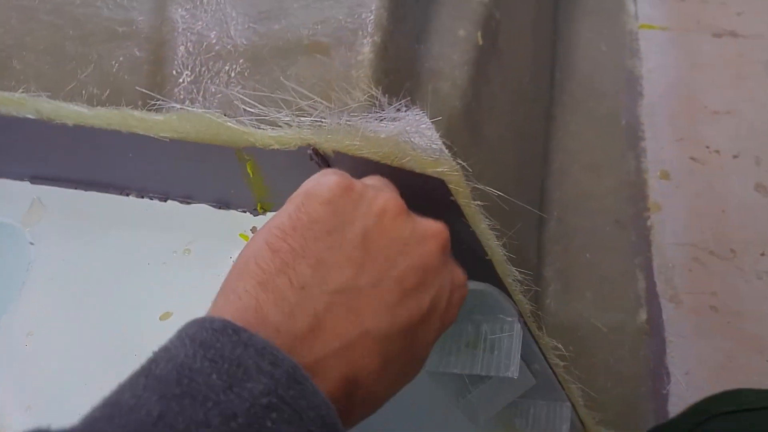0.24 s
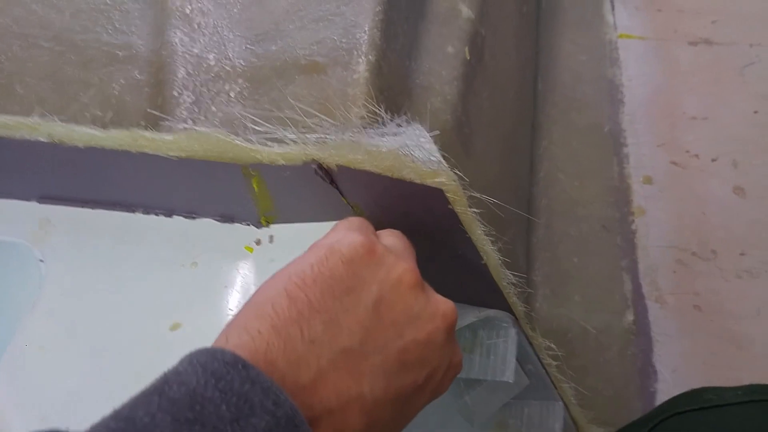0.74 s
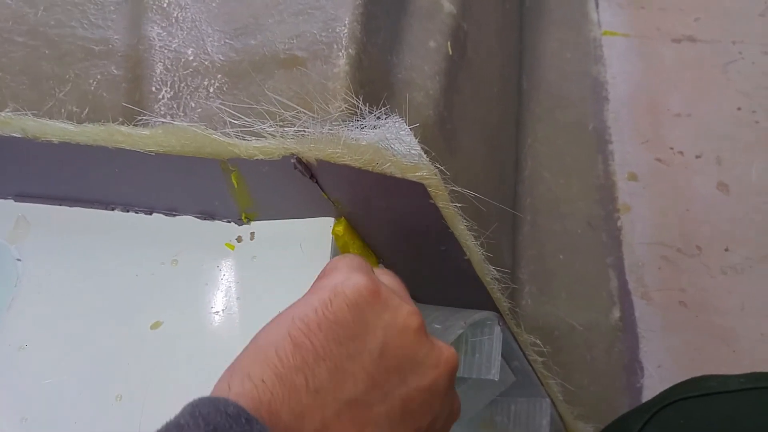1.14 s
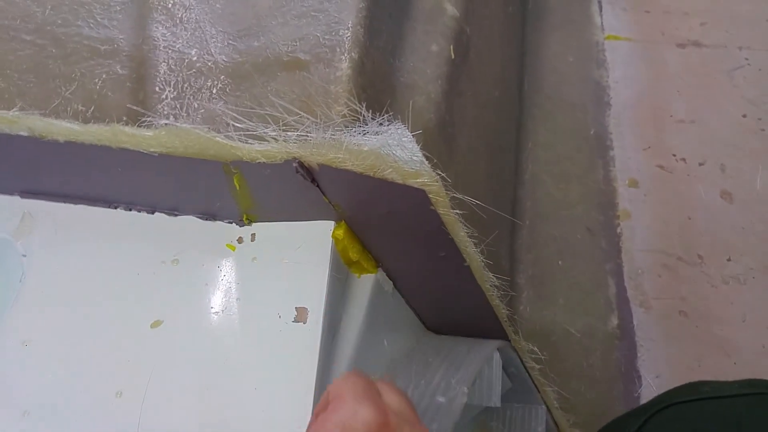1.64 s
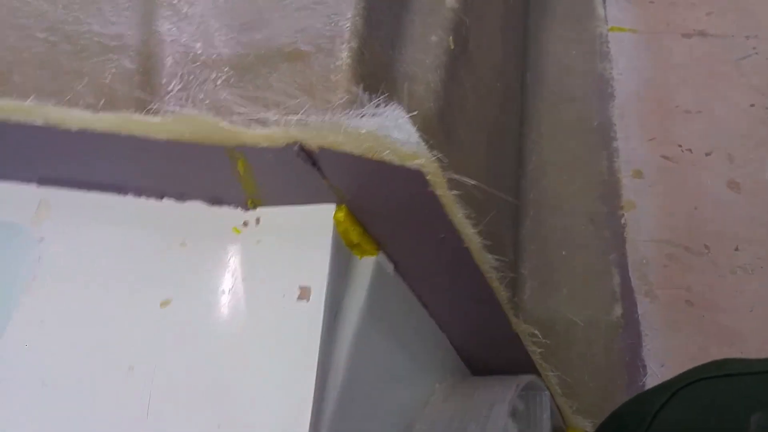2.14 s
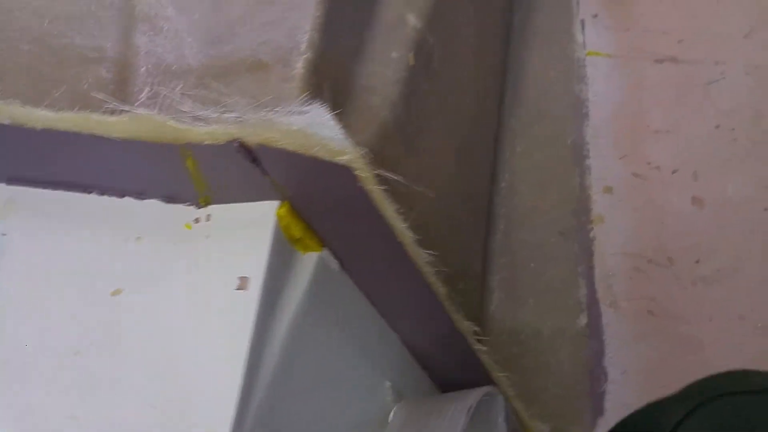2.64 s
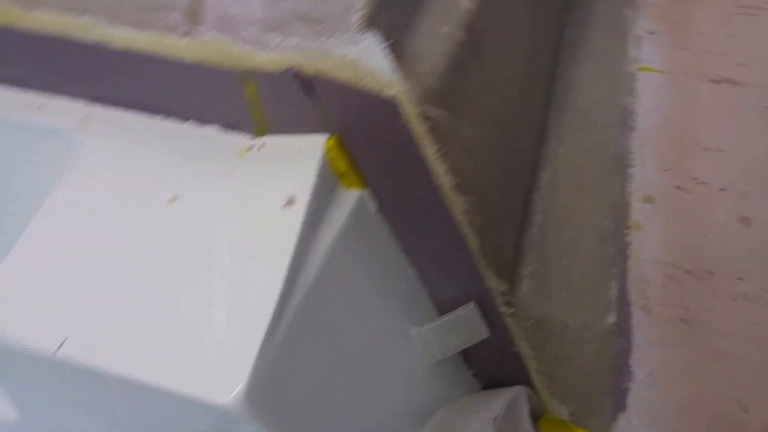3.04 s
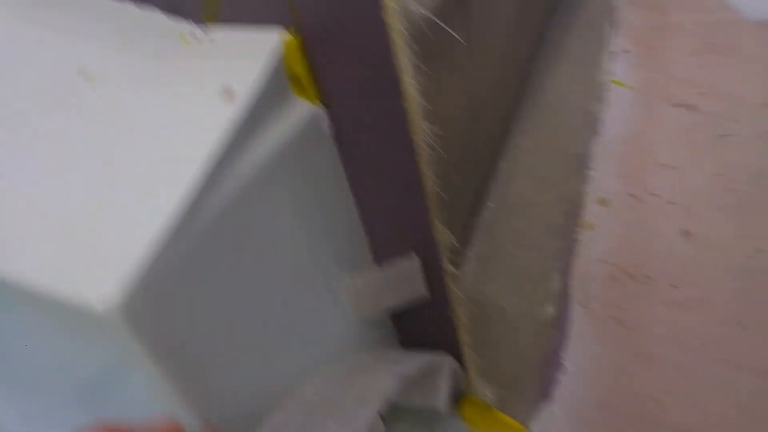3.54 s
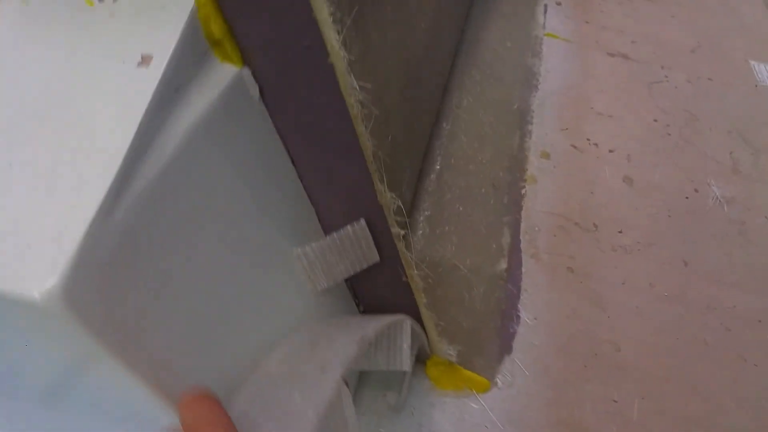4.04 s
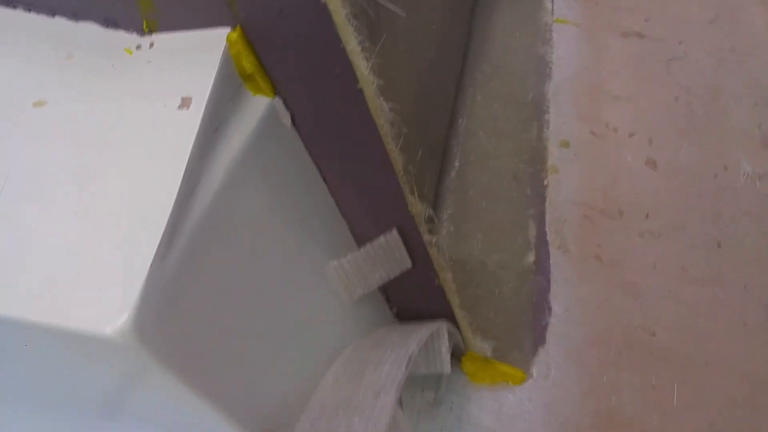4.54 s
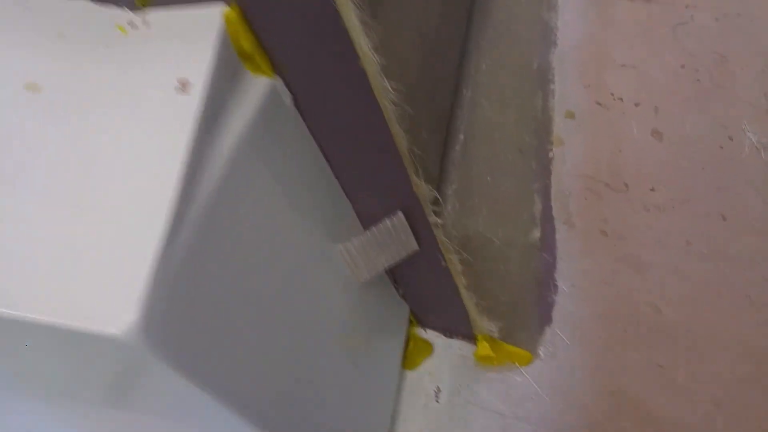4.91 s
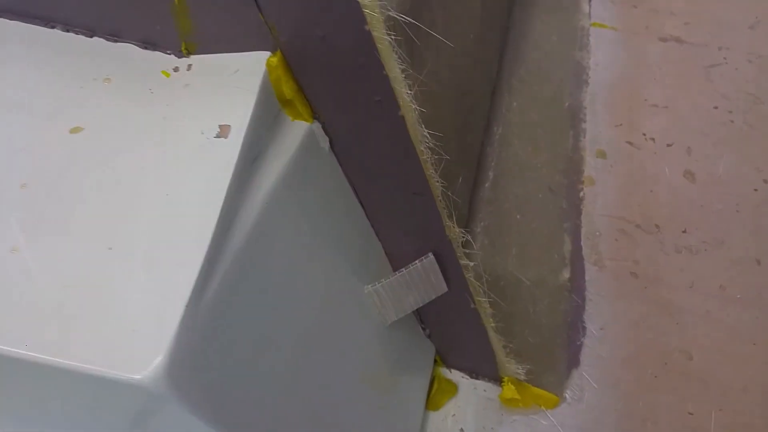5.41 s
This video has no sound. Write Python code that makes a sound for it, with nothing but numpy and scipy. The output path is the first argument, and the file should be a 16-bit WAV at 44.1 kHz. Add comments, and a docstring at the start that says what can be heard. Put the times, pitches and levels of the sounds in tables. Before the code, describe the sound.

Sharp cracks, snaps and fibrous tearing as a stiff fibreglass mould edge is pried loose, with hollow knocks and low air thumps in a workshop.

```python
"""Fibreglass mould prised off its base

A workshop, the mould close to two microphone ports, with a low background rush and a rustling sleeve.
The bond lets go in single snaps, a creak and runs of tearing; each crack sends a bending wave through
the laminate and rings the hollow shell. The loosened edge judders, knocks, booms and fans air, mostly
at the right port. Near surfaces slap back and a bright room answers with diffuse echoes."""
import sys
import numpy as np
from scipy import signal
from scipy.fft import rfft, irfft
from scipy.io import wavfile

SR = 44100
rng = np.random.default_rng(int(sys.argv[2]) if len(sys.argv) > 2 else 0)


def put_to_file(sound):
    """Save the sound as 16-bit audio at rate SR, in the file named by the first command-line argument."""
    columns = np.atleast_2d(sound).T  # one column per channel
    safe = np.clip(columns, -1, 1)
    whole_steps = np.round(safe * 32767)
    wavfile.write(sys.argv[1], SR, whole_steps.astype(np.int16))


N = 250047
TIME = np.arange(N) / SR
AGE = TIME[:2 ** 13]  # seconds since the start of an event

# Colour of the background rush: [pitch_hz, relative_level_db per Hz]
RUSH_COLOUR = [(25, -48), (55, 6), (80, -7.5), (130, -12), (210, -11.5), (320, -4), (410, -4.5), (510, -13),
               (700, 2.5), (1200, -13), (2100, -22), (3800, -28.5), (7000, -25), (16000, -37)]
# Course of the background rush, before its overall gain: [time_s, level_db]
RUSH_LEVEL = [(0.0, -49.5), (0.44, -46), (2.46, -50.5), (2.7, -46), (2.92, -49), (3.16, -44.5),
              (5.67, -47.5)]
# Sleeve rustles as the arm moves: [peak_s, half_length_s, level_db]
RUSTLES = [(3.165, 0.11, -47.5), (3.821, 0.32, -51.5), (4.01, 0.12, -46), (5.032, 0.11, -44.5),
           (5.558, 0.085, -51.5)]
# Colour of the room's answer: [pitch_hz, relative_level_db]
ROOM_COLOUR = [(100, 5), (400, -10.5), (1000, -4.5), (2500, -3), (4500, 0.5), (7000, 1), (10000, -3.5),
               (16000, -0.5)]
# Time for the room to die by 60 dB: [pitch_hz, t60_s]
ROOM_T60 = [(100, 0.75), (700, 0.38), (2500, 0.61), (6500, 0.63), (10000, 0.32), (16000, 0.34)]
# Near surfaces: [left_delay_s, right_delay_s, level_db]
NEAR_SURFACES = [(0.0104, .0116, -22), (0.0137, 0.012, -17), (.0172, .0174, -21)]
# Treble difference between the two microphone ports: [pitch_hz, left_minus_right_db]
PORT_COLOUR = [(300, -3), (700, 4), (1300, -2.5), (2400, -5), (4400, 5.5), (6200, 6), (8000, -4),
               (10000, -10.5), (13000, 0)]

# The edge springs free, booms and pushes air from the gap: [start_s, puff_level_db]
PUFFS = [(1.543, -4), (1.588, -6), (2.03, -4), (2.088, -14)]
# The freed shell and a loose wedge knock on the base: [start_s, pitch_hz, level_db]
KNOCKS = [(1.525, 2010, -9.5), (1.697, 660, -18.5), (2.54, 1223, -10), (2.794, 770, -12), (2.829, 1180, -9),
          (2.837, 480, -20), (3.979, 1090, -27), (4.761, 115.7, -28.5), (4.773, 290, -22.5),
          (4.804, 576, -12), (4.818, 720, -9), (4.8295, 763, -6.5), (4.85, 950, -8.5), (4.86, 720, -18),
          (4.902, 140, -32)]
# Course of the stick-slip creak: [time_s, slips_per_s, level_db]
CREAK = [(2.391, 64, -47), (2.429, 95, -34), (2.48, 100, -32), (2.533, 122, -25.5)]
# Resonances of the creaking edge: [pitch_hz, width_hz, level_db]
CREAK_MODES = [(423, 18, -1.5), (720, 180, 5), (1150, 96, -5), (1300, 77, -5), (1940, 100, -7.5),
               (2470, 190, -4), (6740, 2700, -12), (9900, 1600, -10)]
# Runs of tearing fibres and scraping: [start_s, end_s, plate_level_db, snap_level_db]
TEARS = [(0.474, 0.527, -27, -27), (0.593, 0.637, -32, -34.5), (1.534, 1.624, -55, -33.5),
         (2.025, 2.098, -27.5, -18.5), (2.103, 2.148, -33, -41), (2.68, 2.765, -46, -37.5),
         (2.792, 2.891, -25, -28.5), (3.894, 3.928, -44, -33.5), (3.959, 3.999, -39, -40.5),
         (4.723, 4.731, -38, -29), (4.731, 4.778, -22.5, -20.5), (4.777, 4.852, -32, -30),
         (4.885, 4.924, -28, -36), (4.921, 4.994, -37, -46), (5.482, 5.551, -45, -51)]
# Spells of strain in which stray fibres tick: [start_s, end_s]
STRAIN = [(1.8, 2), (2.6, 2.72)]

# Single cracks, before the plate and snap balance: [start_s, level_db, snap_over_plate_db]
CRACKS = [(.1949, -58.5, 22.5), (0.2453, -38.5, 18.5), (0.3358, -32.5, 14), (0.376, -27.5, 13),
          (0.4644, -17.5, -1.5), (.4783, -19, 8), (0.5201, -25.5, 13), (0.5588, -24, -4),
          (0.5923, -19, 3.5), (0.6296, -31, -3), (.6921, -38.5, -3), (0.9232, -14.5, -7),
          (1.007, -18.5, -12), (1.1024, -27, -9), (1.1206, -45, 22), (1.1978, -32, -8),
          (1.2181, -42.5, 12.5), (1.3193, -33.5, 9), (1.4363, -48, 9), (1.5244, -11.5, -7.5),
          (1.543, -17, 7.5), (1.5469, -19, 2), (1.5637, -22.5, 4.5), (1.5872, -22.5, 13.5),
          (1.632, -28.5, 13.5), (1.6963, -13, -9), (1.7324, -19, 9), (1.9494, -36, 1), (1.9778, -42.5, 8),
          (2.0056, -20.5, 8.5), (2.026, -8.5, -2.5), (2.0416, -17.5, 4), (2.0888, -12, 5),
          (2.121, -25, 11.5), (2.2707, -31, 0), (2.541, -10.5, -8), (2.602, -21, 3.5), (2.6924, -47.5, 19),
          (2.709, -34, 5), (2.7257, -20.5, 5.5), (2.7539, -33.5, 15.5), (2.7914, -15.5, 1.5),
          (2.8298, -12, -5), (2.8463, -12.5, 3.5), (2.8767, -13.5, 0.5), (2.8977, -26, 11.5),
          (3.309, -32.5, -8.5), (3.3227, -32.5, -10), (3.9807, -27.5, -9), (4.2235, -46, 4),
          (4.7373, -33, 19), (4.7407, -22, -4), (4.7613, -11.5, 0.5), (4.772, -15.5, -5),
          (4.8179, -20.5, 1.5), (4.8298, -23, -4), (4.8496, -17.5, -6), (4.889, -30, 5),
          (4.8961, -13.5, -8.5), (5.1172, -33.5, -10.5), (5.5068, -34.5, -6.5), (5.6444, -38, -9.5)]
# Ring of the freed shell over time: [time_s, lowest_hz, ring_over_boom_db, boom_over_crack_db]
FREE_SPAN = [(1, 645, -13.5, -10.5), (1.56, 430, -11, -13), (1.69, 344, -6.5, -9), (2.85, 321, -4.5, -6.5),
             (3.3, 450, -19, -12), (4.83, 267, -14, -4)]
# Ringing modes of the shell: [pitch_hz, relative_level_db, t60_s]
SHELL_MODES = [(301.2, -7.5, 0.14), (347, -8, 0.14), (413.4, 4.5, 0.17), (615.5, -3, 0.16),
               (682, -11.5, 0.19), (789, -9, 0.29), (831, 1, 0.1), (1117, -12, 0.113), (1320, -14, .15),
               (1825, -14, 0.3), (1950, -11.5, 0.12), (2840, -17, 0.13)]
# Colour of the laminate: [pitch_hz, relative_level_db per Hz]
LAMINATE = [(280, -1), (420, 1.5), (520, -6), (740, 1), (1000, -1.5), (1300, 2), (1950, 0), (2600, -1.5),
            (3400, -4.5), (5000, -4), (7300, 3), (9000, -1.5), (11500, -6.5), (16000, -12.5)]
# Upper edges of a crack's bands, shell, plate, snap and sharp edge: [pitch_hz]
BAND_EDGES_HZ = [900, 2900, 10000, 16000]
# Opening span over which each of those bands is levelled: [length_s]
ATTACK_S = [.012, .005, .005, .005]

# Balance within a crack
PLATE_DB, SNAP_DB = -1.4, -2.5
EDGE_DB, EDGE_PER_BRIGHT = -10.5, 0.44  # second: extra dB over the snap's, per dB of brightness
# Snaps between these times sound close, dry and round-edged
DRY_FROM_S, DRY_TO_S, DRY_ROOM_DB, DRY_EDGE_DB = 1.11, 1.5, -7, -1.5
JUDDER_START_S, JUDDER_PER_S, JUDDER_DB, JUDDER_TAPER_DB = 3.8645, 100, -32, 10.5
KNOCK_CYCLES = 1.52  # a knock's swell peaks after this many cycles
SWING_HZ, SWING_DECAY_S, SPRING_BOOM_DB = 60, 0.0096, -30
TOP_HZ = 15900


def undb(db):
    """Decibels to gain."""
    return 10 ** (np.asarray(db) / 20)


def unit(x):
    """Scale to rms 1."""
    return x / np.sqrt(np.mean(x ** 2) + 1e-18)


def add(out, start_s, x):
    """Mix x into out from start_s."""
    i = max(int(start_s * SR), 0)
    out[:, i:i + x.shape[-1]] += x[..., :N - i]


def pan(left_minus_right_db):
    """Gains of the left and right ports for a level difference."""
    return undb(np.array([[left_minus_right_db], [-left_minus_right_db]]) / 2)


def band(x, lo_hz, hi_hz, order=2):
    """Causal band-pass."""
    edges_hz = [lo_hz, min(hi_hz, SR / 2 - 100)]
    return signal.sosfilt(signal.butter(order, edges_hz, "band", fs=SR, output="sos"), x)


def along(points, hz):
    """Read [pitch_hz, value] points on a log-frequency axis."""
    f, value = np.transpose(points)
    return np.interp(np.log(hz + 1), np.log(f), value)


def colour(x, points):
    """Minimum-phase filter with the response of [pitch_hz, level_db] points."""
    size = 2 ** 10
    gain = undb(along(points, np.fft.rfftfreq(size, 1 / SR)))
    cepstrum = irfft(np.log(gain))
    # fold the cepstrum forward in time so the filter is causal
    cepstrum[1:size // 2] *= 2
    cepstrum[size // 2 + 1:] = 0
    impulse = irfft(np.exp(rfft(cepstrum)))
    return signal.fftconvolve(x, impulse[None], axes=1)[:, :x.shape[1]]


def pair(size, apart_hz):
    """Noise at two ports: more alike the further below apart_hz, unrelated above."""
    mid, side = rfft(rng.standard_normal((2, size)))
    share = np.clip(np.fft.rfftfreq(size, 1 / SR) / apart_hz, .25, 1)
    ports_spectrum = mid + share * side * np.array([[1], [-1]])
    return irfft(ports_spectrum / np.sqrt(1 + share ** 2), size)


def wander(count):
    """Random values joined by straight lines over the whole scene."""
    return np.interp(TIME, np.linspace(0, TIME[-1], count), rng.standard_normal(count))


def background(rush_db=3):
    """Low shaped noise fills the workshop; a sleeve rustles as the arm moves, its level flickering."""
    level_db = rush_db + np.interp(TIME, *np.transpose(RUSH_LEVEL))
    rush_gain = undb(along(RUSH_COLOUR, np.fft.rfftfreq(N, 1 / SR)))
    rush = unit(irfft(rfft(pair(N, 650)) * rush_gain, N))
    moves = sum(undb(db) * np.exp(-((TIME - s) / half_s) ** 2) for s, half_s, db in RUSTLES)
    sleeve = unit(band(colour(pair(N, 1980), LAMINATE), 1100, 9700))
    return rush * undb(level_db + wander(2 ** 7)) + sleeve * moves * undb(2 * wander(2 ** 8))


def room(x, wet_db=-12.0, build_s=0.0011, gap_s=0.011):
    """Diffuse echoes of the workshop after a short gap, each octave dying at its own rate."""
    age = TIME[:SR]
    noise = rfft(pair(SR, 1340))
    octave = np.log2(np.arange(SR // 2 + 1) + 1)
    centres = np.arange(7, 15)  # octaves, as powers of two in Hz
    tail = 0
    for c in centres:
        share = np.interp(octave, centres, centres == c)
        tail = tail + irfft(noise * share) * undb(-60 * age / along(ROOM_T60, 2. ** c))
    build = 1 - np.exp(-np.maximum(age - gap_s, 0) / build_s)
    tail = colour(unit(tail * build) / np.sqrt(SR), ROOM_COLOUR)
    return undb(wet_db) * signal.fftconvolve(x, tail, axes=1)[:, :N]


def echoes(x):
    """Slaps from near surfaces, reaching the two ports at slightly different delays."""
    out = np.zeros((2, N))
    for *delays_s, db in NEAR_SURFACES:
        for port, delay_s in enumerate(delays_s):
            add(out[port:port + 1], delay_s, undb(db) * x[port])
    return out


def ports(x):
    """Close sound reaches each port with its own treble colour, half the difference on each side."""
    heard = []
    for port, side in enumerate((1, -1)):
        points = [(hz, side * db / 2) for hz, db in PORT_COLOUR]
        heard.append(colour(x[port:port + 1], points))
    return np.vstack(heard)


def puffs(eddy_db=-8, eddy_s=0.0044):
    """The swinging edge fans air as a damped low sine, mostly at the right port; eddies add a thump."""
    out = np.zeros((2, N))
    port_gain = undb([[-21], [1]])
    swing = np.exp(-AGE / SWING_DECAY_S) * np.sin(2 * np.pi * SWING_HZ * AGE) * port_gain
    for s, db in PUFFS:
        eddies = np.exp(-AGE / eddy_s) * unit(band(pair(len(AGE), 250), 39, 306)) * pan(-13.5)
        add(out, s, undb(db) * (swing + undb(eddy_db) * eddies))
    return out


def knocks(rattle=0.39):
    """Soft contacts swell and die within a few cycles, with a little rattle."""
    out = np.zeros((2, N))
    for s, hz, db in KNOCKS:
        progress = AGE * hz / KNOCK_CYCLES
        noise = unit(band(pair(len(AGE), 2500), hz / 2, hz * 2))
        body = np.sin(2 * np.pi * hz * AGE) + rattle * noise
        add(out, s, undb(db) * progress * np.exp(1 - progress) * body)
    return out


def creak(count=32, uneven_db=2.5, pitch_wander=.04, grit_db=-3):
    """The edge slips in quickening, gritty steps; each rings the resonances a little differently."""
    out = np.zeros((2, N))
    age = AGE[:2 ** 11]
    times, rate, db = np.transpose(CREAK)
    hz, width, mode_db = np.transpose(CREAK_MODES)[:, :, None]
    fade = undb(mode_db) * np.exp(-np.pi * width * age)
    looseness = np.clip(width / 150, 0, 1) ** 2  # the narrowest mode stays almost put
    s = times[0]
    for wait, shift, *weights in rng.standard_normal((count, len(hz) + 2)):
        grit = undb(grit_db) * unit(colour(pair(len(age), 2500), LAMINATE)) * np.exp(-age / 0.0022)
        if s < times[-1]:
            pitch = hz * (1 + pitch_wander * shift * looseness)
            ring = undb(uneven_db * np.array(weights)) @ (fade * np.sin(2 * np.pi * pitch * age))
            add(out, s, undb(np.interp(s, times, db)) * (ring + grit) * pan(-2.5))
        s += np.exp(0.14 * wait) / np.interp(s, times, rate)
    return band(out + 1e-18, 455, 12000)


def free_span(s):
    """Lowest frequency, ring level and boom level of the loose part at time s."""
    times, *columns = np.transpose(FREE_SPAN)
    return [np.interp(s, times, column) for column in columns]


def fibres(clicks, ring_s=0.00076, plate_s=0.0013):
    """Tiny fractures as the flexing plate and the brittle resin pass them on."""
    parts = []
    for decay_s in (plate_s, ring_s):
        response = pair(len(AGE), 3400) * np.exp(-AGE / decay_s)
        parts.append(colour(signal.fftconvolve(clicks[None], response, axes=1), LAMINATE))
    return parts


def tearing(per_s=750, spread_db=2.0, count=3):
    """Dense runs of fibres letting go at several places, a few louder than the rest."""
    out = np.zeros((2, N))
    shape = (count, len(AGE))
    for start, end, plate_db, snap_db in TEARS:
        running = AGE < end - start
        sizes = undb(spread_db * np.minimum(rng.exponential(size=shape), 3))
        sizes = sizes * rng.choice([-1, 1], shape)
        clicks = sizes * running * (rng.random(shape) < per_s / count / SR)
        plate, snap = np.sum([fibres(place) for place in clicks], axis=0)[..., :len(AGE)]
        plate = band(plate, free_span(start)[0], 4700, order=3)
        snap = band(snap, 2000, 19000)
        for db, part in ((plate_db, plate), (snap_db, snap)):
            add(out, start, undb(db) * part / (np.std(part[:, running]) + 1e-9) * pan(-1.7))
    return out


def dry_spell(s):
    """True while the snaps sound close and dry."""
    return (s > DRY_FROM_S) & (s < DRY_TO_S)


def shell_modes():
    """The free ringing of each mode of the shell."""
    hz, db, t60 = np.transpose(SHELL_MODES)[:, :, None]
    return np.sin(2 * np.pi * hz * AGE) * undb(db - 60 * AGE / t60)


def bending_wave(travel_s):
    """A click spread by the plate: delay is travel_s at 1 kHz, falling as one over root frequency."""
    khz = np.fft.rfftfreq(len(AGE), 1 / SR) / 1000
    return irfft(np.exp(-4j * np.pi * 1000 * travel_s * np.sqrt(khz)))


def crack_levels(s, db, bright_db):
    """Levels of shell, plate, snap and sharp edge; a brighter crack has a sharper edge."""
    edge_db = EDGE_DB + (1 + EDGE_PER_BRIGHT) * bright_db + DRY_EDGE_DB * dry_spell(s)
    return db + np.array([free_span(s)[2], PLATE_DB, SNAP_DB + bright_db, edge_db])


def crack(s, levels_db, modes, travel_s=0.000701, direct=5.4, scatter_s=0.00021):
    """A fracture: direct bending wave, waves scattered from the edges, and the ring of the shell."""
    # one value per band: shell, plate, snap, sharp edge
    fast_s = [0.0062, 0.0024, 0.002, 0.0004]
    slow_s = [0.022, 0.011, 0.0027, 0.0026]
    slow_db = [-15.0, -18.0, -12.5, -12.0]
    lowest_hz, ring_db, _ = free_span(s)
    edges = [lowest_hz] + list(BAND_EDGES_HZ)
    travel = travel_s * np.exp(0.208 * rng.standard_normal())
    wave = np.array([bending_wave(travel), bending_wave(travel * 1.057)])  # left, right
    scatter = pair(len(AGE), 2900) * (1 - np.exp(-AGE / scatter_s))
    out = 0
    for k, db in enumerate(levels_db):
        fade = np.exp(-AGE / fast_s[k]) + undb(slow_db[k]) * np.exp(-AGE / slow_s[k])
        part = band(colour(direct * wave + scatter * fade, LAMINATE), edges[k], edges[k + 1], order=3)
        out = out + undb(db) * part / np.std(part[:, :int(ATTACK_S[k] * SR)])
    # each place excites the modes differently
    strength = undb(rng.standard_normal(len(modes))) * rng.choice([-1, 1], len(modes))
    return out * pan(-1.6) + undb(levels_db[0] + ring_db) * (strength @ modes)


def booms(late_s=0.00184, duller_db=-7):
    """Each time the edge springs free, the hollow shell takes a dull blow."""
    out = np.zeros((2, N))
    modes = shell_modes()
    levels_db = SPRING_BOOM_DB + duller_db * np.arange(len(BAND_EDGES_HZ))
    for s, _ in PUFFS:
        add(out, s + late_s, crack(s, levels_db, modes))
    return out


def judder(count=7, first_bright_db=-5, last_bright_db=4):
    """The shell judders over its base: even slips, loudest mid-run and ever brighter."""
    out = np.zeros((2, N))
    modes = shell_modes()
    for k, progress in enumerate(np.linspace(0, 1, count)):
        s = JUDDER_START_S + k / JUDDER_PER_S
        db = JUDDER_DB - JUDDER_TAPER_DB * (2 * progress - 1) ** 2
        bright_db = first_bright_db + progress * (last_bright_db - first_bright_db)
        add(out, s, crack(s, crack_levels(s, db, bright_db), modes))
    return out


def ticks(count=4, db=-48, bright_db=6, spread_db=3):
    """Faint snaps of stray fibres, scattered over each spell of strain."""
    out = np.zeros((2, N))
    modes = shell_modes()
    for start, end in STRAIN:
        times = start + (end - start) * (np.arange(count) + rng.random(count)) / count
        for s, (louder, brighter) in zip(times, spread_db * rng.standard_normal((count, 2))):
            add(out, s, crack(s, crack_levels(s, db + louder, bright_db + brighter), modes))
    return out


def cracks(lead_db=-21, lead_s=0.0013):
    """All the single snaps; a few fibres give way in a rising hiss just before each one."""
    out = np.zeros((2, N))
    modes = shell_modes()
    before = AGE[:2 ** 9][::-1]  # seconds left until the snap
    noise = rng.standard_normal((len(CRACKS), 2, len(before)))
    first_fibres = unit(band(noise, 4300, 13000)) * np.exp(-before / lead_s)
    for (s, db, bright_db), lead in zip(CRACKS, first_fibres):
        add(out, s, crack(s, crack_levels(s, db, bright_db), modes))
        add(out, s - before[0], undb(db + bright_db + lead_db) * lead)
    return out


def scene():
    """The mould at the microphone ports, with its echoes, room, puffs of air and background."""
    mould = knocks() + creak() + tearing() + booms() + judder() + ticks() + cracks()
    to_room = mould * undb(DRY_ROOM_DB * dry_spell(TIME))
    return background() + room(to_room) + echoes(mould) + puffs() + ports(mould)


def record(dry, low_hz=35):
    """The recorder drops the deepest bass, flattens the hardest peaks and cuts the top."""
    dry = signal.sosfilt(signal.butter(3, low_hz, "high", fs=SR, output="sos"), dry)
    rounded = dry / (1 + dry ** 4) ** (1 / 4)
    return signal.sosfilt(signal.ellip(8, .2, 70, TOP_HZ, fs=SR, output="sos"), rounded)


dry = scene()
out = record(dry)
put_to_file(out)
```